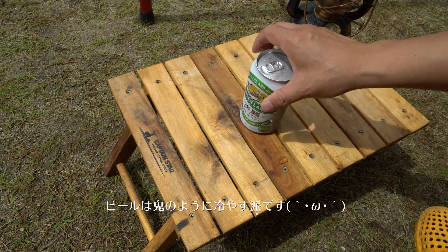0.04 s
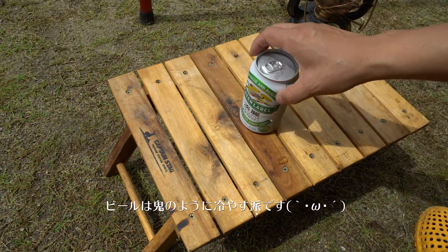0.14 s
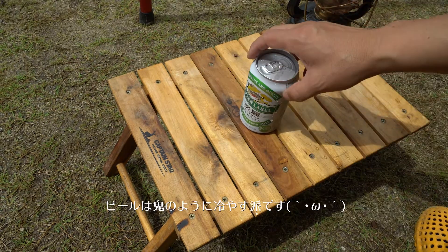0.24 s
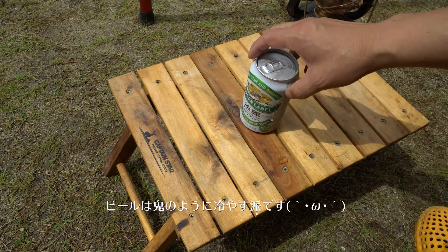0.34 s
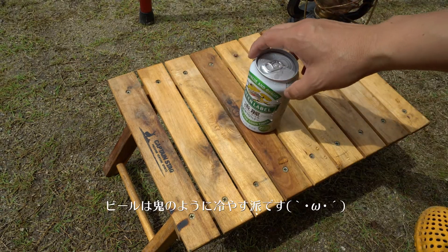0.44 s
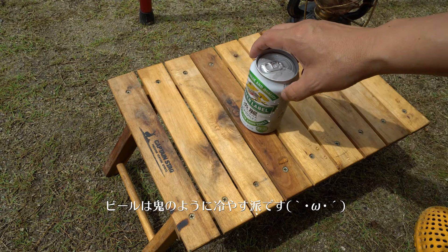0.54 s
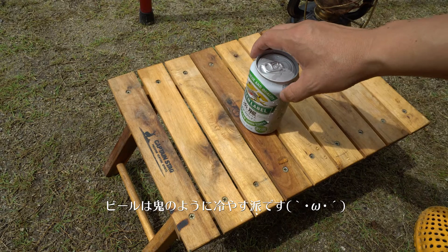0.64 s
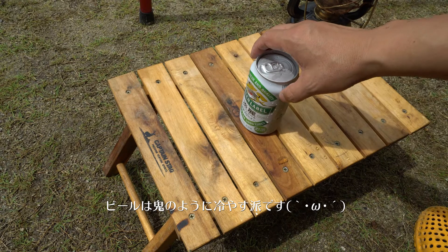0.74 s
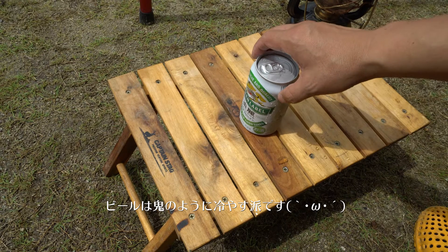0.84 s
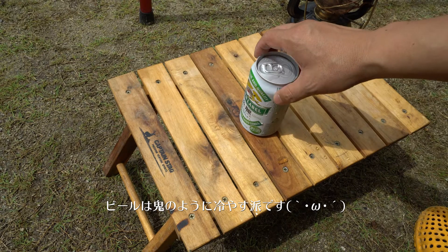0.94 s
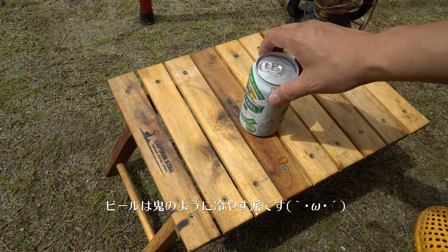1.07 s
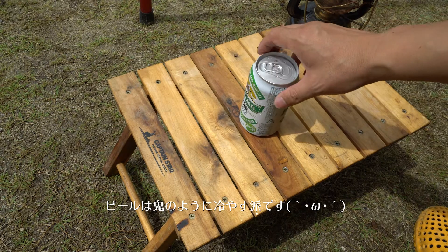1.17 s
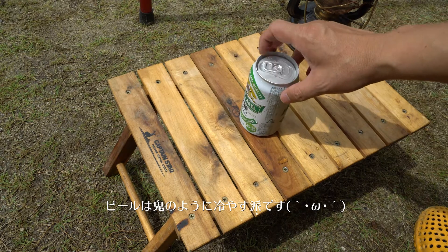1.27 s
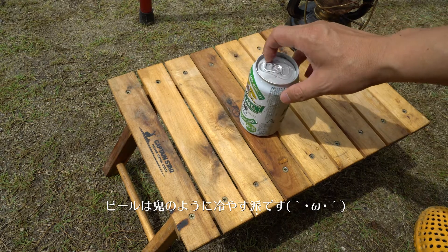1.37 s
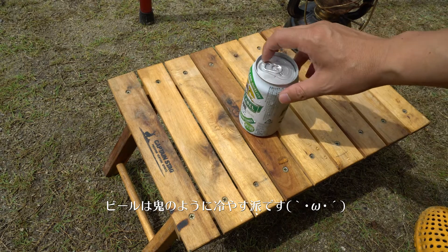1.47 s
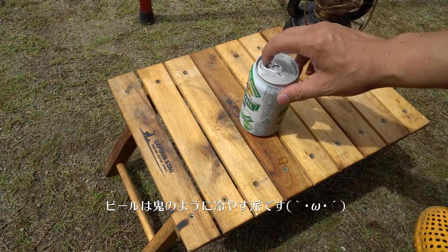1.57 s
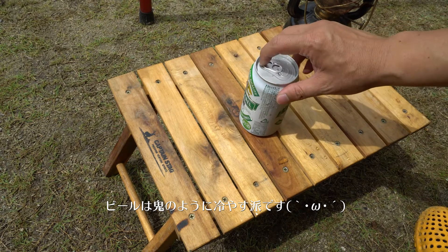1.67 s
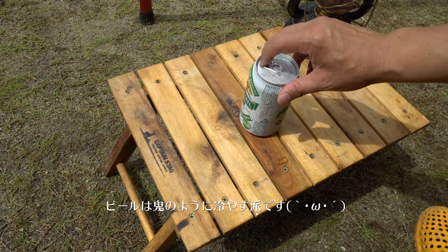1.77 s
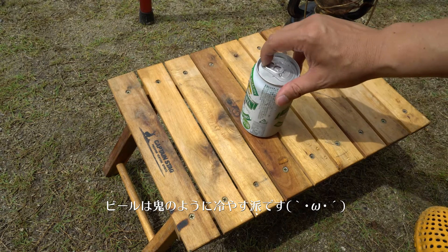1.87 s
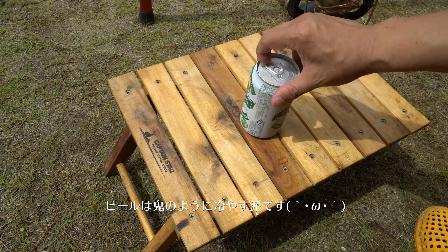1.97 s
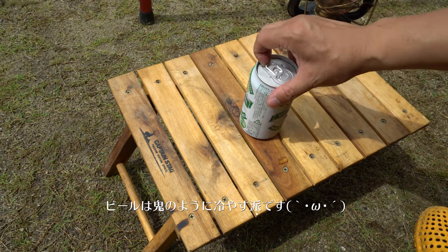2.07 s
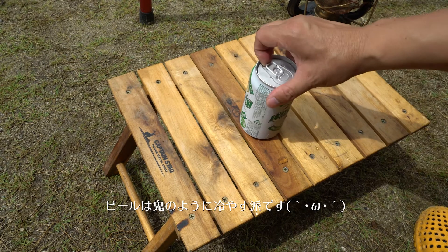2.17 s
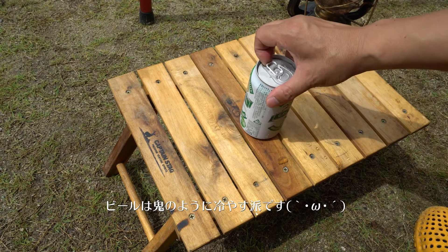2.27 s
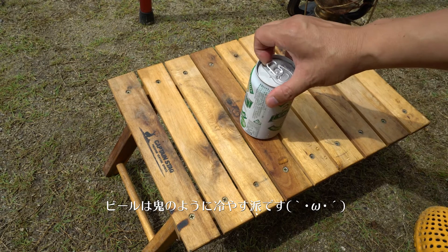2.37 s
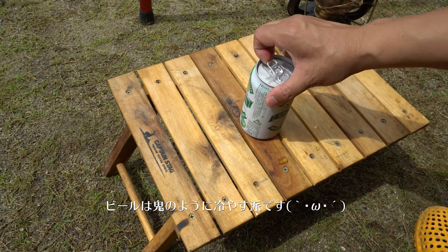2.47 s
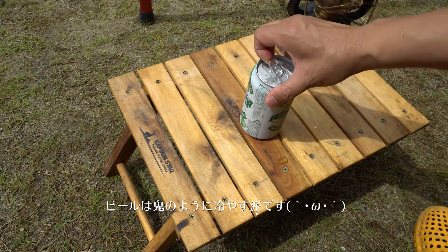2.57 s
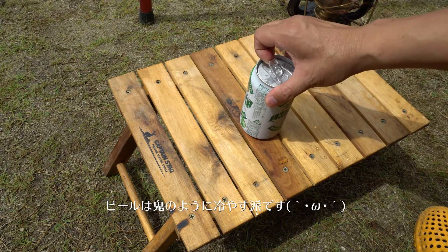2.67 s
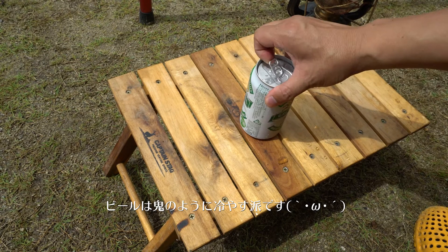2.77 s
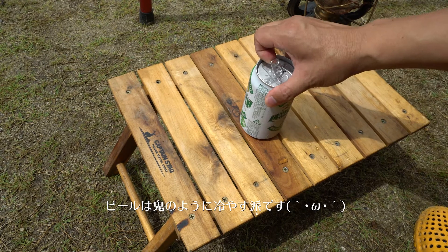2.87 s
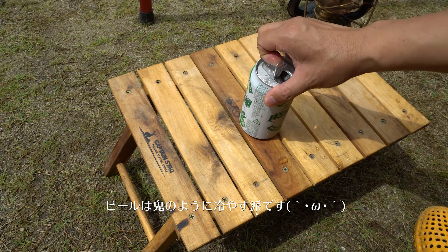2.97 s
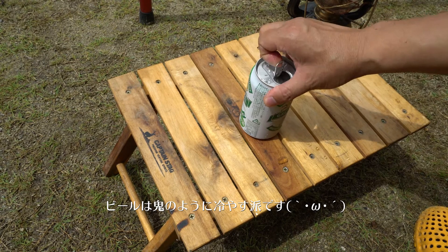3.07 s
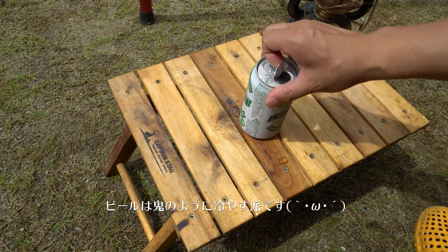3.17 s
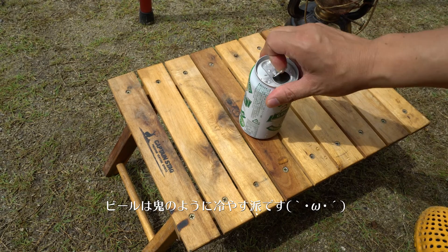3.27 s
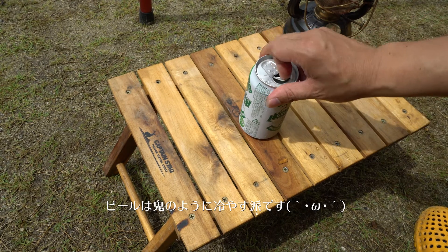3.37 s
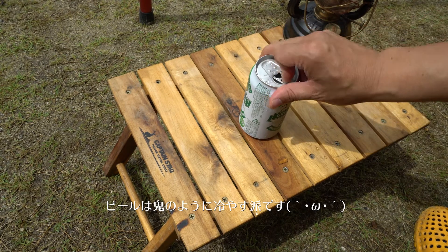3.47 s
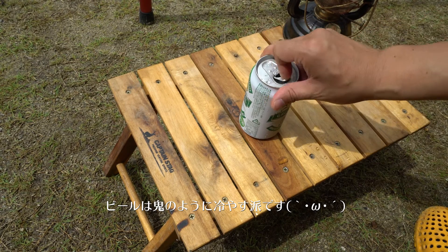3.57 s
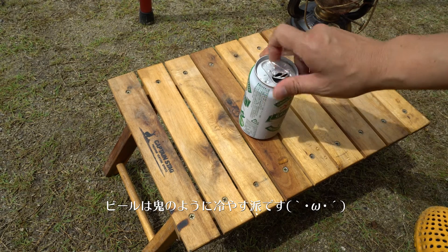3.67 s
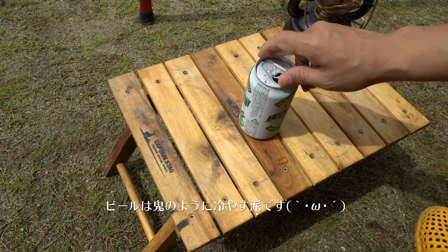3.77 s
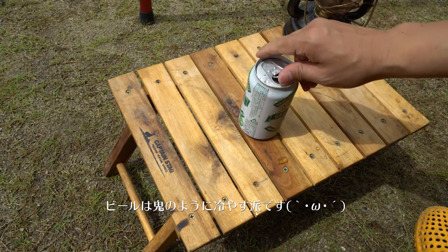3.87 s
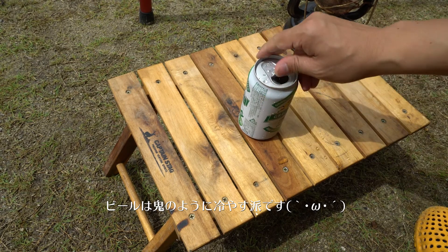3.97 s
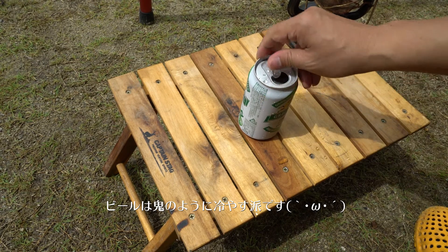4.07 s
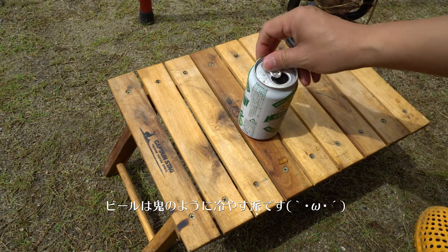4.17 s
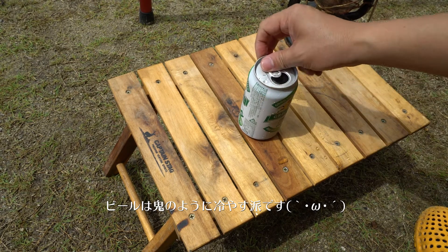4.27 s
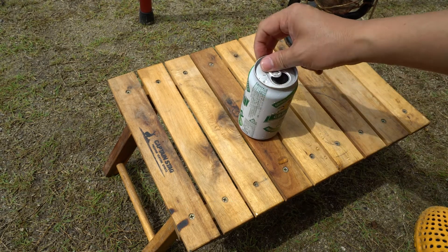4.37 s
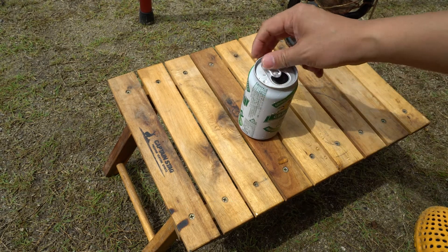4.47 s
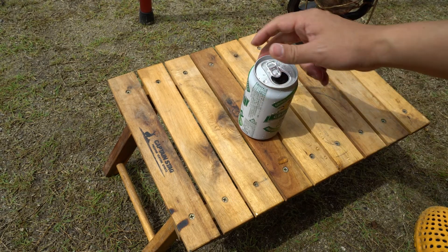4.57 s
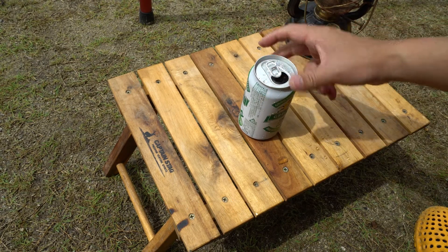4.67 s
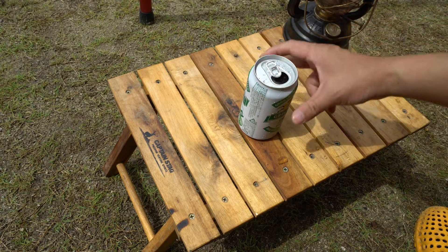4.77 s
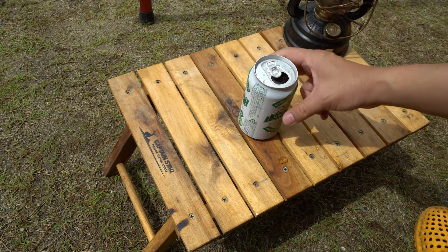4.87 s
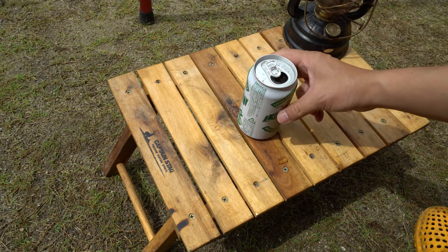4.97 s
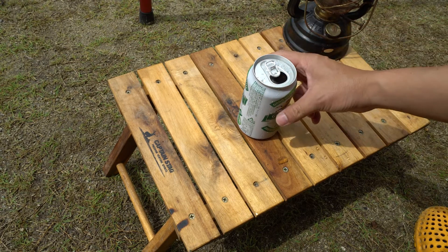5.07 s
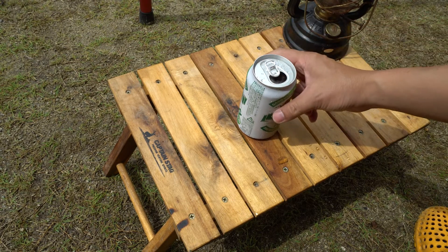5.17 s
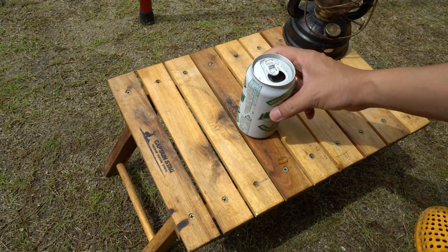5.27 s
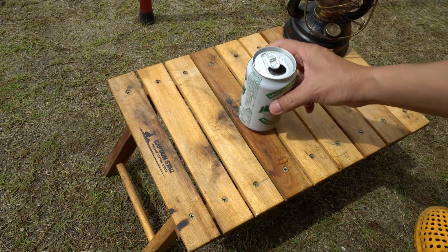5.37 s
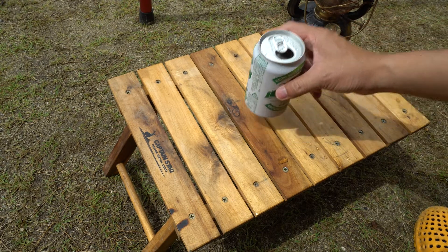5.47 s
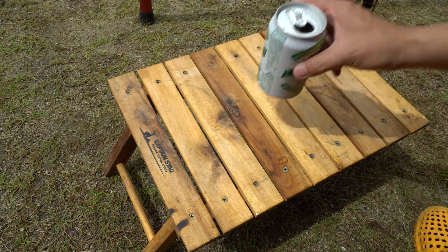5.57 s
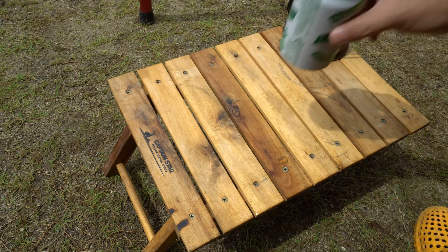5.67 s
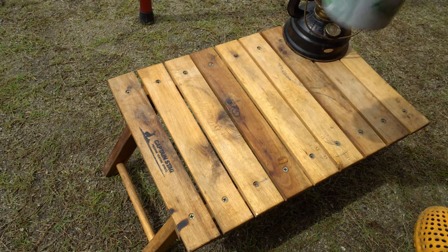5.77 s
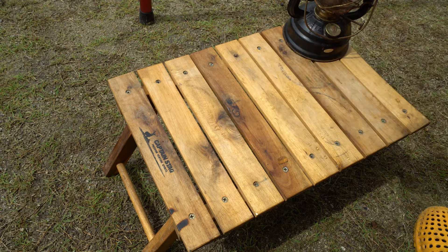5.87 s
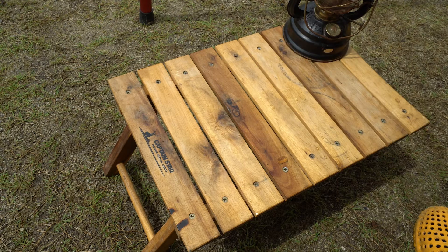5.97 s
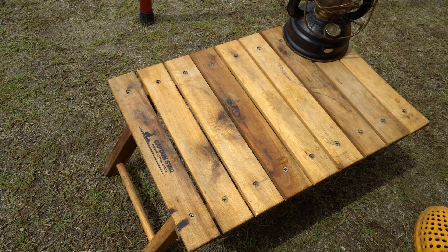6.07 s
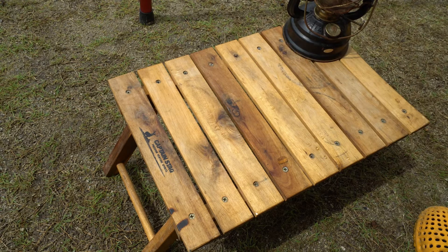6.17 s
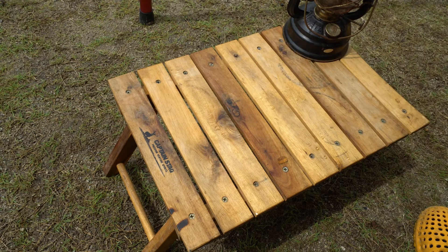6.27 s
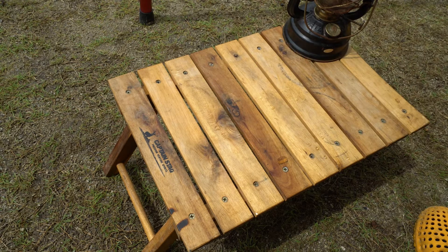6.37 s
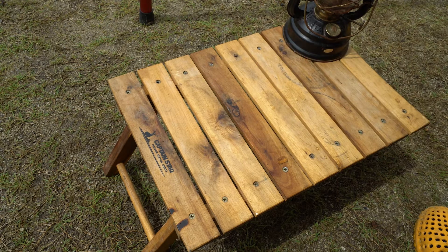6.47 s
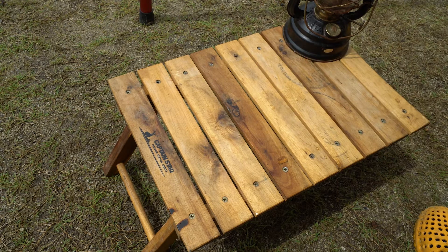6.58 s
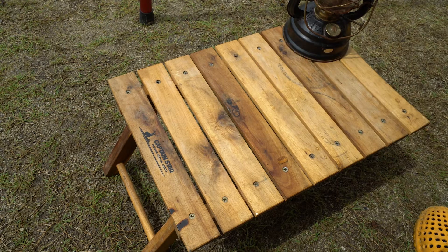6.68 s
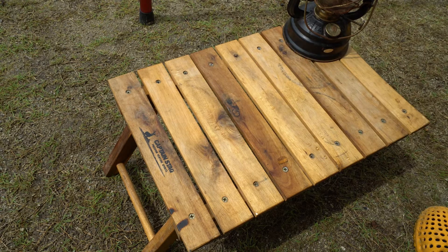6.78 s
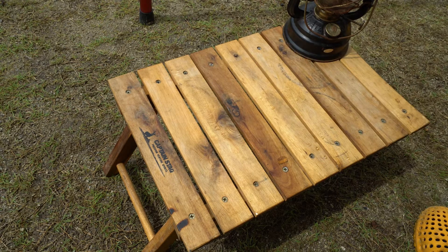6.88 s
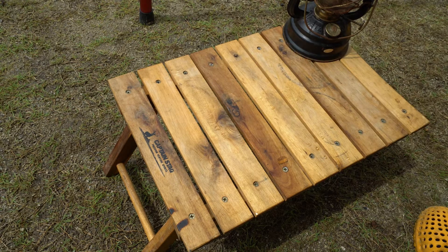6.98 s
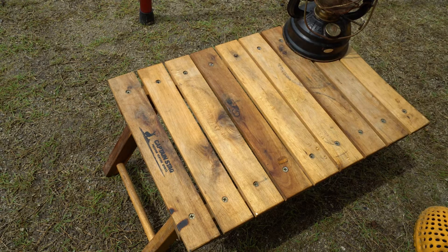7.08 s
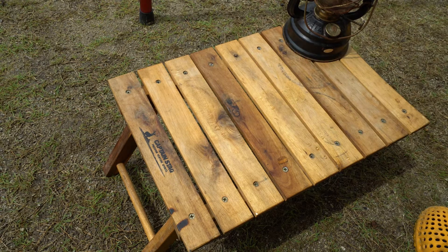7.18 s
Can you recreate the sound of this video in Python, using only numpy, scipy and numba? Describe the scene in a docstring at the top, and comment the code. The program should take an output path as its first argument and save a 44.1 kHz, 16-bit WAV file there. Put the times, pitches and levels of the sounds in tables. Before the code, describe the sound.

Distant running water makes a soft, wide, steady rush for all seven seconds, with a barely audible hum and slight breeze beneath it. Close by and slightly to the right, fingers tick faintly on an aluminium drink can from about 0.8 to 2.2 seconds. At 2.5 seconds the tab cracks the seal, and gas hisses brightly for a tenth of a second, ending in the loudest sharp crack at 2.6. Around 2.9 to 3 seconds the lid tears open in a rapid cluster of briefly ringing metallic snaps, with a slight low thump and a tiny puff. Light ticks follow, with a duller knock of the tab at 3.7 and a small click at 4.3. A few faint handling ticks come around 5.7 and once more at 6.4. The space is open air, with almost no echo.

```python
"""An aluminium drink can is opened on a slatted wooden table outdoors.
The tab cracks the seal, gas hisses out, the groove in the lid tears in snaps and the flap is folded.
Each snap, and each tick of a finger, makes the metal ring. Far water rushes on the left, over a faint
hum and a light breeze. An automatic volume control turns everything down after the loud cracks."""
import sys
import numpy as np
from scipy import signal
from scipy.fft import rfft, irfft, next_fast_len
from scipy.io import wavfile
from numba import njit

SR = 44100
rng = np.random.default_rng(int(sys.argv[2]) if len(sys.argv) > 2 else 0)


def persist_wave(psi):
    """Save psi, clipped to +-1, as 16-bit WAV."""
    counts = np.round(np.clip(psi, -1, 1) * 32767).astype(np.int16)
    wavfile.write(sys.argv[1], SR, np.atleast_2d(counts).T)


N = 318402
T = np.arange(N) / SR
FFT_SIZE = next_fast_len(N + 4096)
HZ = np.maximum(np.arange(FFT_SIZE // 2 + 1) * SR / FFT_SIZE, 1)


def can_snaps():
    """Each snap is a dying crackle that rings the can's natural tones, most near its brightest pitch."""
    # Tones of lid, tab and wall. Each row: pitch in Hz, level in dB, seconds to fade by 60 dB.
    metal_tones = [(430, -17, .05), (510, -14, .09), (640, -16, .04), (1065, -4, .045), (1254, -4, .042),
                   (1395, -5, .05), (1560, -1, .024), (1800, -2, .024), (1980, -2, .026), (2412, -6, .036),
                   (3040, -4, .034), (3340, -7, .036), (3790, -1, .036), (4000, -4, .03), (4330, 0, .04),
                   (5090, -5, .04), (5570, 0, .028), (5850, -2, .036), (6750, -2, .032), (7700, -10, .034),
                   (8400, -10, .028), (9100, -2, .028), (9850, -9, .028), (10800, -12, .026),
                   (12300, -16, .024), (13600, -11, .02)]
    # The bare crack adds very short tones, weaker above the lid's main band.
    crack_tones = [(f, -3.5 - 10 * max(np.log2(f / 6500), 0), .008) for f in np.geomspace(1350, 14000, 18)]
    hz, tone_db, fade_s = np.transpose(metal_tones + crack_tones)
    signs = (-1) ** np.arange(len(hz))
    t = np.arange(int(.15 * SR)) / SR
    out = np.zeros(N + SR)
    for start_s, level_db, bright_hz, crackle_s, ring, below_db, above_db in contacts():
        crackle = rng.standard_normal(len(t)) * np.exp(-t / crackle_s)
        crackle[0] = 2.01   # the first slip is the hardest
        octaves = np.log2(hz / bright_hz)
        loss_db = np.where(octaves < 0, -below_db, above_db) * octaves
        strength = signs * from_db(tone_db - loss_db + 2.2 * rng.standard_normal(len(hz)))
        bent_hz = hz * (1 + .008 * rng.standard_normal(len(hz)))   # the lid bends between snaps
        # Divide out the crackle's own colour, so that the contact sets each tone's share.
        strength /= abs(crackle[:900] @ np.exp(2j * np.pi * np.outer(t[:900], bent_hz)))
        tones = np.sin(2 * np.pi * np.outer(t, bent_hz)) * from_db(-60 * t[:, None] / (fade_s * ring))
        ringing = signal.fftconvolve(crackle, tones @ strength)[:len(t)]
        down, up = 2 ** (14.5 / np.array([below_db, above_db]))   # the band ends 14.5 dB down
        band_hz = [max(bright_hz / down, 330), min(bright_hz * up, 18000)]
        snap = signal.sosfilt(signal.butter(3, band_hz, "band", fs=SR, output="sos"), ringing)
        at = round(start_s * SR)
        out[at:at + len(t)] += from_db(level_db) * snap / np.std(snap[:SR // 300])
    return out[:N]


def contacts():
    """List everything that strikes the metal, with how long it rings and how wide its sound is."""
    # Each row: start in seconds, strength in dB, brightest pitch in Hz, crackle length in seconds.
    finger_ticks = [(0.828, -41.5, 2960, 0.0075), (1.082, -54, 8000, 0.0038), (1.441, -40, 5200, 0.0015),
                    (1.523, -47.5, 5850, 0.0039), (1.769, -36.5, 4430, 0.00058),
                    (1.802, -44, 10200, 0.0042), (2.1594, -54, 7900, .0044), (3.374, -44, 2970, .0014),
                    (3.5086, -36, 6550, 0.00083), (3.6932, -44, 7650, .002), (3.84, -55, 7000, .0026),
                    (4.2294, -44.5, 2800, 0.0065), (4.3186, -29.5, 3900, 0.00023),
                    (5.6605, -49, 8350, 0.0013), (5.693, -39.5, 5260, 0.004), (5.709, -44, 5030, .002),
                    (5.762, -53, 5910, .003), (6.374, -45.5, 3260, 0.0063)]
    seal_cracks = [(2.5182, -13, 4200, 0.00086), (2.6043, -0.5, 3730, 0.00046)]
    flap_and_tab_knocks = [(2.9863, -11, 1850, 0.00072), (3.6813, -21, 1600, .0003),
                           (3.6872, -23, 1330, 0.00038), (3.713, -41, 1450, 0.0041)]
    # The groove tears. Each row: the same four, then a factor for the ring length.
    groove_tears = [(2.8632, -32, 4500, 0.0015, 0.45), (2.8751, -29.5, 5000, 0.00079, .4),
                    (2.8778, -26, 5130, 0.0022, 1), (2.894, -37, 5870, 0.0011, 0.45),
                    (2.9297, -38, 5000, .0005, 0.29), (2.933, -8.5, 6300, .0006, 1.6),
                    (2.9375, -10, 5940, 0.00061, 0.41), (2.9382, -12, 5900, 0.0031, 0.76),
                    (2.944, -26, 4400, 0.0051, 1.1), (2.9674, -21, 5070, 0.00071, 0.51),
                    (2.9697, -11, 4460, 0.0016, 0.65), (2.9828, -10.5, 5140, .0004, 0.15),
                    (2.986, -4, 6500, 0.00115, 1.26)]
    # Rows grow to end in: ring factor, dB lost per octave below and above the brightest pitch.
    return ([(*row, 5.5, 5.5) for row in groove_tears]
            + [(*row, .35, 13, 6.5) for row in finger_ticks]   # the grip damps the metal
            + [(*row, .4, 44, 11) for row in seal_cracks]
            + [(*row, 1.2, 7, 9) for row in flap_and_tab_knocks])


def escaping_gas():
    """Gas sputters through the cracked seal, sighs through the wider gap and puffs as the flap opens."""
    # The jet's hiss. Each row: pitch in Hz, relative level in dB.
    jet_colour = [(530, -74), (900, -53), (1760, -20), (2300, -35), (3700, -15), (5860, -7.5), (8350, -4),
                  (15000, -7), (15900, -10), (16500, -38.5)]
    # Pitches that the opening favours. Each row: pitch in Hz, width in Hz, relative level in dB.
    jet_whistles = [(5910, 150, 8), (8370, 120, 7.5), (9100, 89, 5), (10300, 82, -13), (12100, 37, -15),
                    (13700, 72, -14), (14400, 61, 4)]
    sigh_tones = [(3770, 160, 6.5), (5500, 300, 2.5), (6300, 500, -23), (8500, 1500, -44), (1630, 370, -10)]
    open_s, shut_s, sigh_s, puff_s = 2.52, 2.599, 2.606, 2.988
    air, whistle_air = rng.standard_normal((2, N))
    hiss = unit_level(apply_filter(air, from_db(over_hz(jet_colour))))
    whistles = unit_level(resonances(whistle_air, jet_whistles))
    jet = unit_level(hiss + from_db(-1.5) * whistles)
    rise_db = -37 * np.exp(-np.maximum(T - open_s, 0) / .015)
    sputter_db = 1.7 * drift(rate_hz=440)
    flow = from_db(-6.5 + rise_db + sputter_db) * fade(shut_s, fade_s=.017) * (T > open_s)
    body = resonances(air, sigh_tones)
    sigh = from_db(-20) * fade(sigh_s, fade_s=.098) * np.clip((T - sigh_s) / .002, 0, 1)
    puff = fade(puff_s, fade_s=.095) * (T > puff_s)
    return (flow + from_db(-30) * puff) * jet + (sigh + from_db(-27) * puff) * body


def flap_thump():
    """One short, low push as the flap breaks through."""
    start_s, pitch_hz = 2.933, 75
    tone = np.sin(2 * np.pi * pitch_hz * np.maximum(T - start_s, 0))
    return from_db(-36) * fade(start_s, fade_s=.019) * tone


def place_on_table(can):
    """The can stands to the right: the left microphone is shaded and late. Each side has its own echoes."""
    # The shading. Each row: pitch in Hz, left level minus right level in dB.
    balance = [(300, -1), (1000, -3), (2000, -1.5), (4000, -4), (5200, -7), (6000, -2), (7500, -6),
               (10000, -7.5), (14000, -9.5)]
    # Echoes off table and hand. Each row: left delay in seconds, right delay in seconds, level in dB.
    reflections = [(.00019, 0.00016, -16), (.0011, 0.00093, -36), (.0027, .0034, -20), (.0071, 0.015, -24)]
    left_lag_s, scatter_fade_s = .000014, .045
    tilt = from_db(over_hz(balance) / 2)
    t = np.arange(SR // 8) / SR
    out = []
    for side, direct in enumerate([tilt * np.exp(-2j * np.pi * HZ * left_lag_s), 1 / tilt]):
        echoes = sum(from_db(row[2]) * np.exp(-2j * np.pi * HZ * row[side]) for row in reflections)
        # Many small, dull echoes off slats and grass blur into a short tail.
        tail = signal.lfilter([1], [1, -.95], rng.standard_normal(len(t)))
        tail *= from_db(-60 * t / scatter_fade_s)
        scatter = from_db(-11) * rfft(tail / np.linalg.norm(tail), FFT_SIZE)
        out.append(apply_filter(can[side], direct * (1 + echoes + scatter)))
    return np.array(out)


def far_water():
    """Distant running water: a broad rush and a brighter hiss that swell gently together."""
    # The swell. Each row: time in seconds, level of the rush in dB.
    swell = [(0, -47.5), (1, -48), (2, -46.5), (3.5, -47.5), (5, -46.5), (7.22, -47.5)]
    # The two colours. Each row: pitch in Hz, relative level in dB.
    rush_colour = [(15, -63), (25, -70), (95, -17.5), (162, -14), (258, -8.5), (287, -9), (320, -8),
                   (371, -4.5), (489, -5.5), (747, -2), (1330, -0.5), (2070, -0.5), (4000, -3.5),
                   (5200, -32), (8800, -120)]
    hiss_colour = [(1760, -18), (3000, -5.5), (3770, -6.5), (4570, -2), (5090, 0), (5740, -1.5),
                   (7370, -13), (11600, -23), (15100, -25.5), (16200, -30), (16500, -51)]
    level = from_db(np.interp(T, *np.transpose(swell)))
    return level * (water_noise(rush_colour) + from_db(-.92) * water_noise(hiss_colour))


def water_noise(colour):
    """Wide, slightly flickering noise: one part reaches both microphones, and each has a part of its own."""
    # How alike the sides are. Each row: pitch in Hz, shared part from 0 to 1.
    likeness = [(100, 0.98), (300, 0.97), (700, 0.64), (1500, 0.11), (2800, 0.57), (4300, 0.33),
                (5600, 0.49), (7000, 0.28), (9000, 0.4), (13000, .15)]
    # How far the left wave runs ahead. Each row: pitch in Hz, lead in radians.
    left_lead = [(0, 0), (600, -.2), (1210, -.2), (1700, 2.1), (2500, 3.5), (3790, 3.8), (4910, 6),
                 (5940, 6.7), (7150, 8.7), (7920, 10.9), (9220, 11.7), (10600, 12.6), (16400, 12.6)]
    # Which side is louder. Each row: pitch in Hz, left level minus right level in dB.
    balance = [(60, -2), (130, 1), (290, -1.5), (640, 2.5), (1410, 4.5), (3100, -1), (6820, 0),
               (15000, 1.5)]
    shared, left_only, right_only = rfft(rng.standard_normal((3, FFT_SIZE)))
    alike = over_hz(likeness)
    lead = np.exp(1j * np.interp(HZ, *np.transpose(left_lead)))
    tilt = from_db(over_hz(balance) / 2)
    left = (np.sqrt(alike) * shared * lead + np.sqrt(1 - alike) * left_only) * tilt
    right = (np.sqrt(alike) * shared + np.sqrt(1 - alike) * right_only) / tilt
    noise = irfft(np.array([left, right]) * from_db(over_hz(colour)), FFT_SIZE)[:, :N]
    return unit_level(noise) * from_db(.7 * drift(rate_hz=11))


def hum():
    """A faint, steady tone that wavers in level."""
    # Each row: pitch in Hz, average level in dB.
    tones = [(290.7, -71)]
    return sum(from_db(db + 2 * drift(rate_hz=2.2)) * np.sqrt(2) * np.sin(2 * np.pi * hz * T)
               for hz, db in tones)


def wind():
    """A light breeze with a few puffs rumbles on the microphones."""
    # Each row: time of the puff's peak in seconds, level in dB.
    gusts = [(2.25, -69.5), (2.7, -63), (4.42, -71), (4.56, -71), (4.66, -71), (4.78, -78), (4.96, -76),
             (5.4, -74), (6.56, -80)]
    breeze_db, gust_s = -86, .04
    rumble = signal.sosfilt(signal.butter(2, [40, 90], "band", fs=SR, output="sos"), rng.standard_normal(N))
    puffs = sum(from_db(db) * np.exp(-((T - peak_s) / gust_s) ** 2) for peak_s, db in gusts)
    return (from_db(breeze_db) + puffs) * unit_level(rumble)


def from_db(db):
    """Turn decibels into a factor to multiply by."""
    return 10 ** (np.asarray(db) / 20)


def unit_level(x):
    """Scale a sound so that its average level (root mean square) is 1."""
    return x / np.sqrt(np.mean(x ** 2) + 1e-20)


def fade(start_s, fade_s):
    """Stay at 1 until the start, then fall by 60 dB every fade_s seconds."""
    return from_db(-60 * np.maximum(T - start_s, 0) / fade_s)


def over_hz(points):
    """Join rows of pitch and value into a curve over all pitches."""
    hz, value = np.transpose(points)
    return np.interp(np.log(HZ), np.log(hz), value)


def apply_filter(x, response):
    """Scale and delay each pitch in a sound as the response says."""
    return irfft(rfft(x, FFT_SIZE) * response, FFT_SIZE)[..., :N]


def drift(rate_hz):
    """A smooth random wobble, about 1 in size."""
    r = np.exp(-2 * np.pi * rate_hz / SR)
    return unit_level(signal.lfilter([1], [1, -2 * r, r * r], rng.standard_normal(N + SR))[SR:])


def resonances(noise, peaks):
    """Let noise ring at a few pitches and add up the results."""
    out = np.zeros(N)
    for hz, width_hz, db in peaks:
        r = np.exp(-np.pi * width_hz / SR)
        feedback = [1, -2 * r * np.cos(2 * np.pi * hz / SR), r * r]
        out += from_db(db) * unit_level(signal.lfilter([1, 0, -1], feedback, noise))
    return out


@njit
def follow(target, rise_s, fall_s):
    """Trail behind a changing value, at one speed going up and another going down."""
    out, value = np.empty_like(target), 0.
    for i in range(len(target)):
        lag_s = rise_s if target[i] > value else fall_s
        value += (target[i] - value) / (lag_s * SR)
        out[i] = value
    return out


def scene():
    """The can in front; water, hum and wind behind."""
    water = far_water()
    can = can_snaps() + flap_thump() + escaping_gas()
    swirl = from_db(-17) * np.array([escaping_gas(), escaping_gas()])   # each side hears its own eddies
    return place_on_table(can + swirl) + water + hum() + wind()


def record(dry):
    """Cut the deepest bass and top treble. Loud sound pulls the volume down; it returns in two stages."""
    low_cut_hz, high_cut_hz = 72, 16150
    threshold_db, removed_share, slow_share = -28.5, .77, .46
    dry = signal.sosfilt(signal.butter(2, low_cut_hz, "high", fs=SR, output="sos"), dry)
    power = signal.lfilter([.01], [1, -.99], np.mean(dry ** 2, axis=0))
    excess_db = np.maximum(10 * np.log10(power + 1e-12) - threshold_db, 0)
    quick_db = follow(removed_share * excess_db, rise_s=.0012, fall_s=.035)
    slow_db = follow(quick_db, rise_s=.09, fall_s=.57)
    turned_down = dry * from_db(-(1 - slow_share) * quick_db - slow_share * slow_db)
    return signal.sosfilt(signal.cheby2(18, 50, high_cut_hz, fs=SR, output="sos"), turned_down)


dry = scene()
out = record(dry)
persist_wave(out)
```